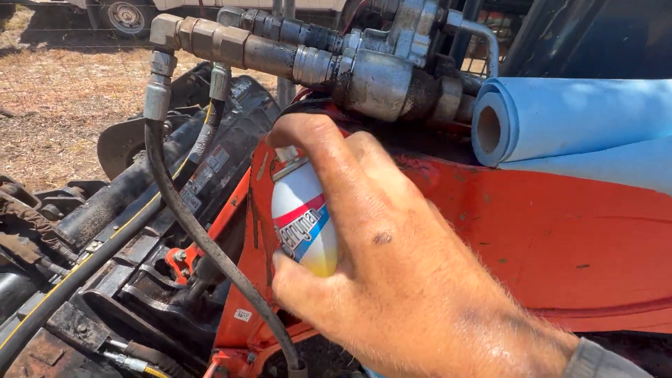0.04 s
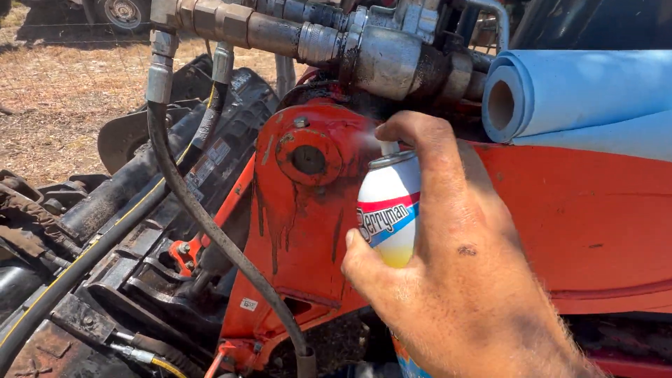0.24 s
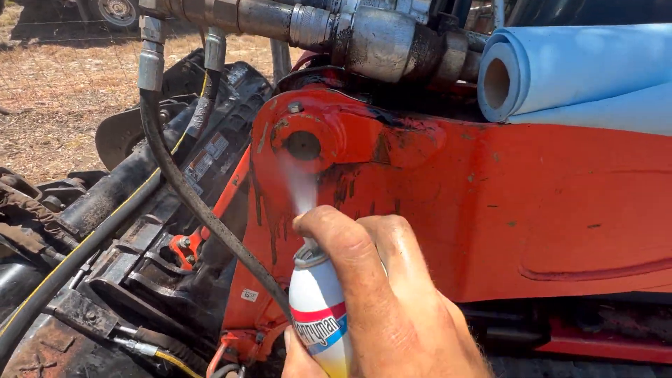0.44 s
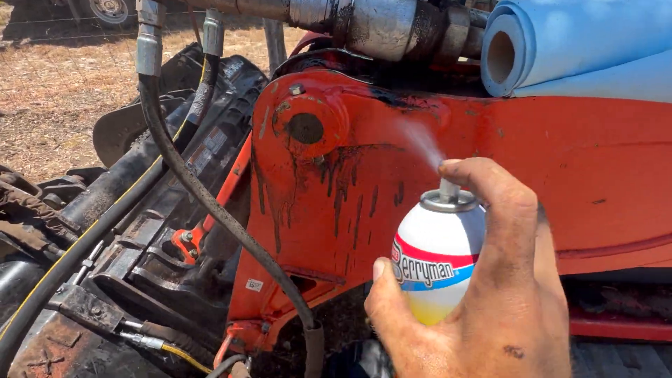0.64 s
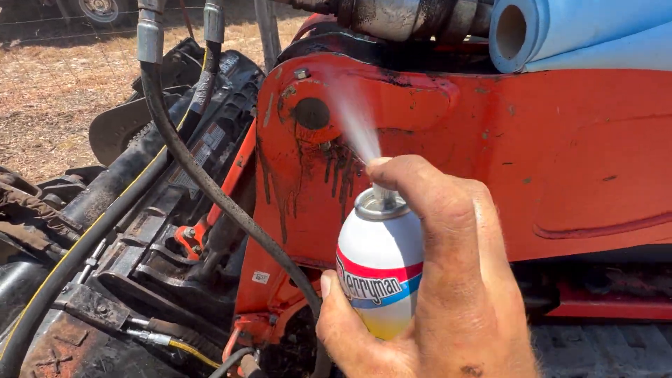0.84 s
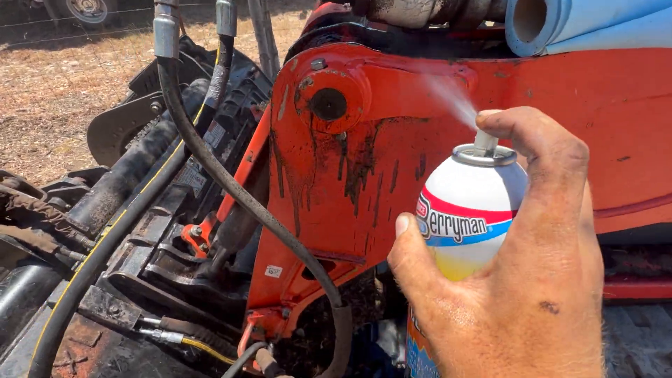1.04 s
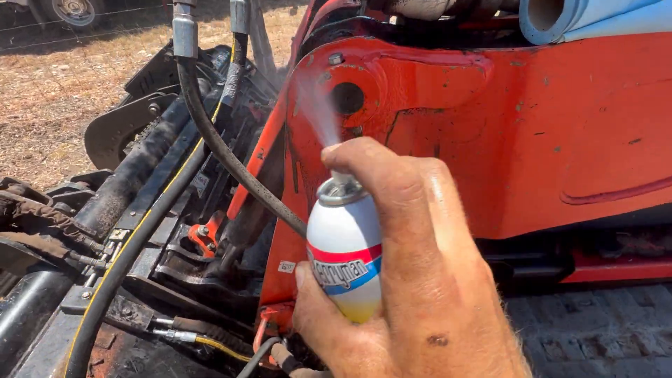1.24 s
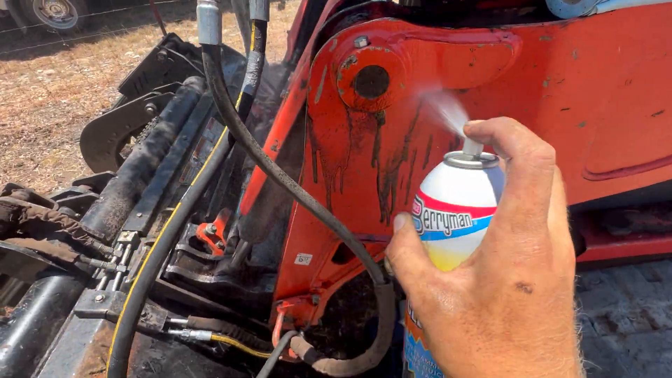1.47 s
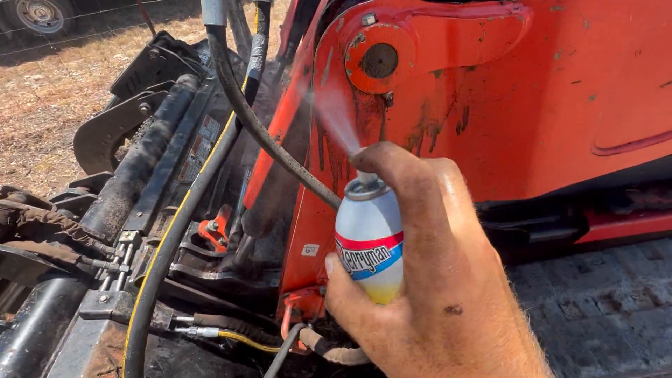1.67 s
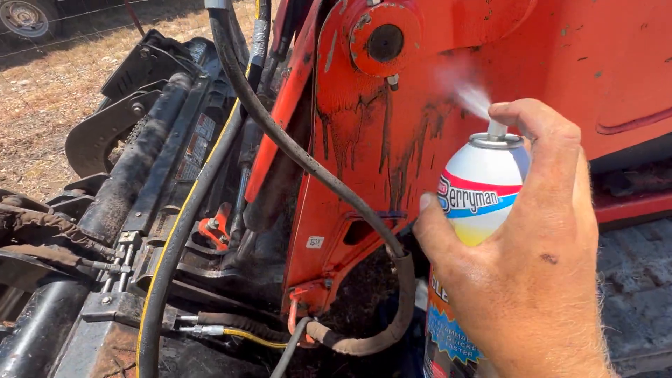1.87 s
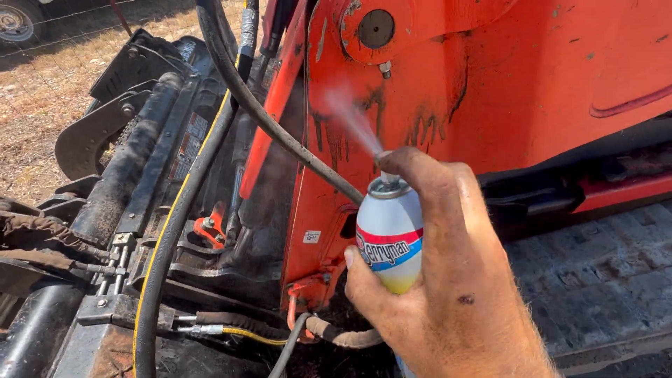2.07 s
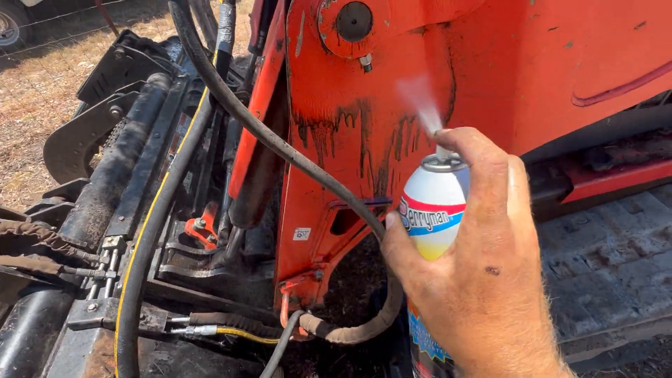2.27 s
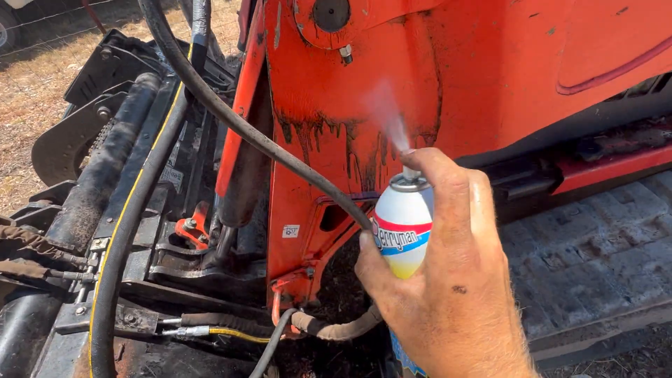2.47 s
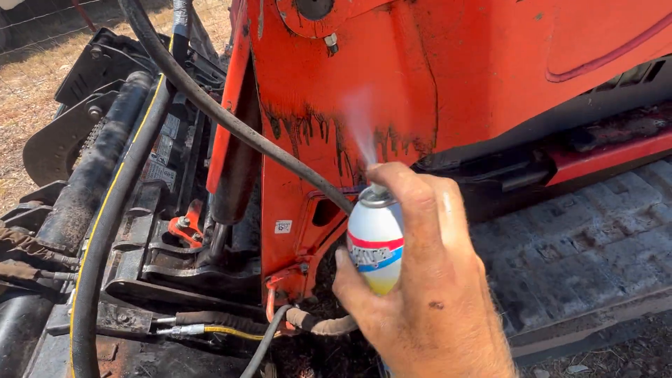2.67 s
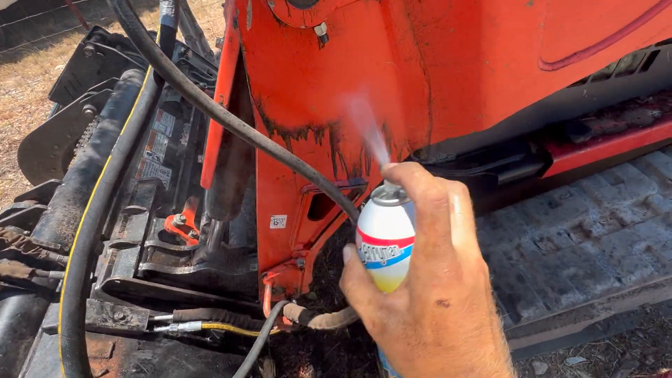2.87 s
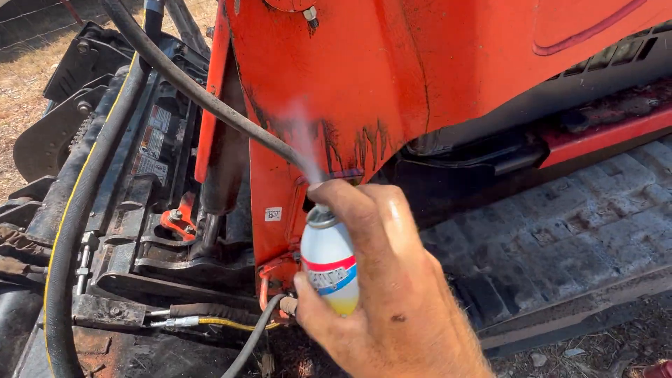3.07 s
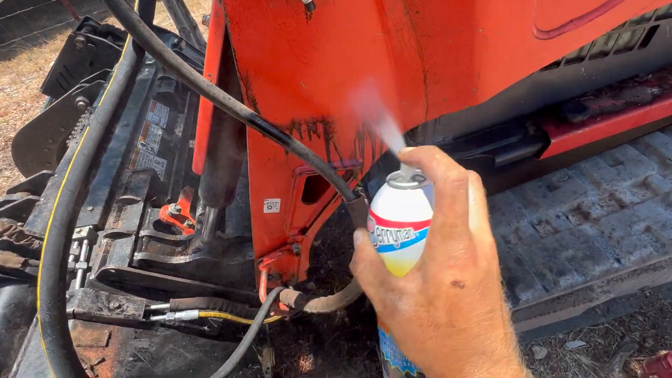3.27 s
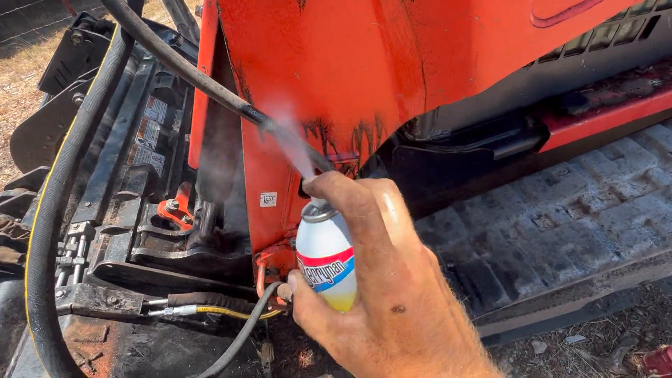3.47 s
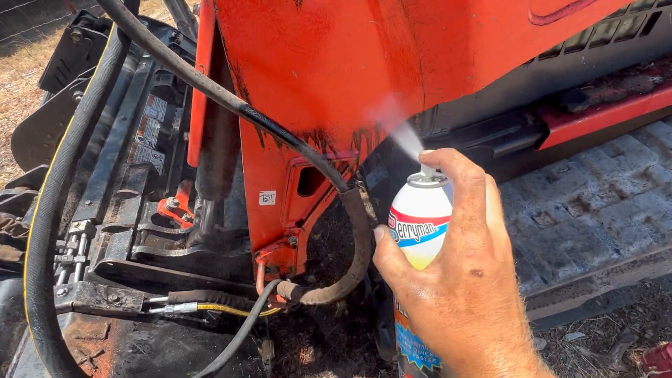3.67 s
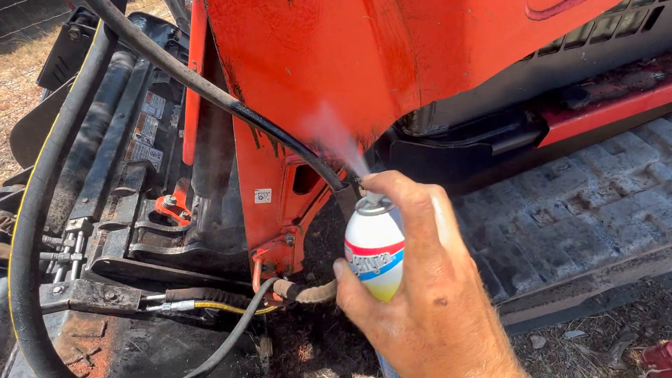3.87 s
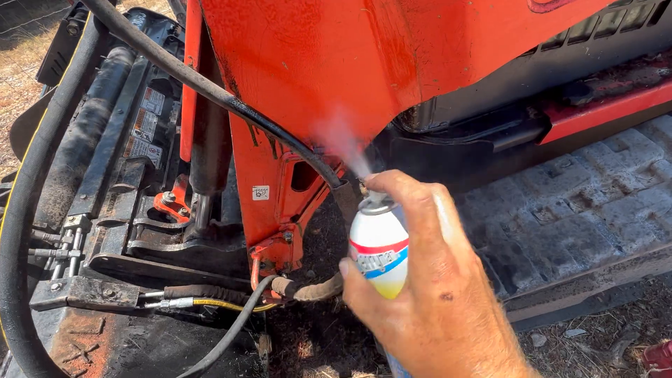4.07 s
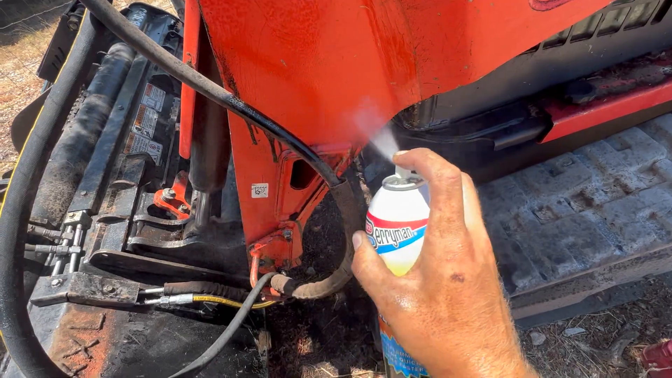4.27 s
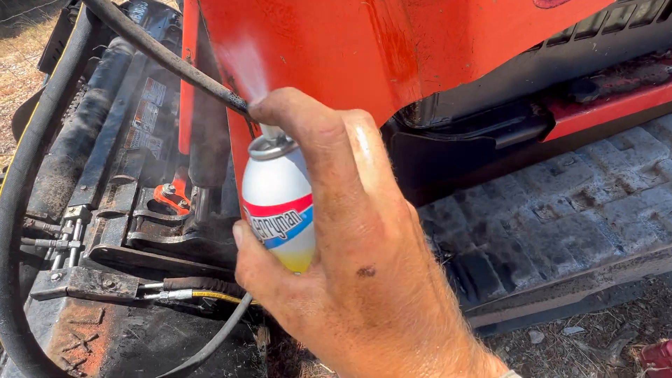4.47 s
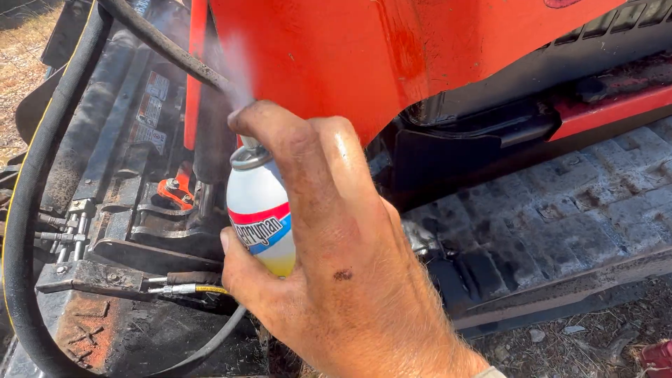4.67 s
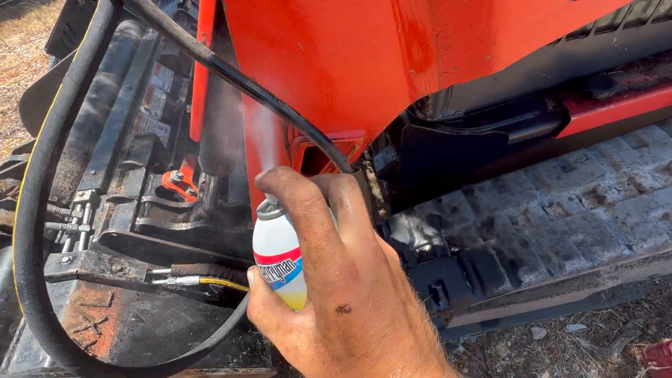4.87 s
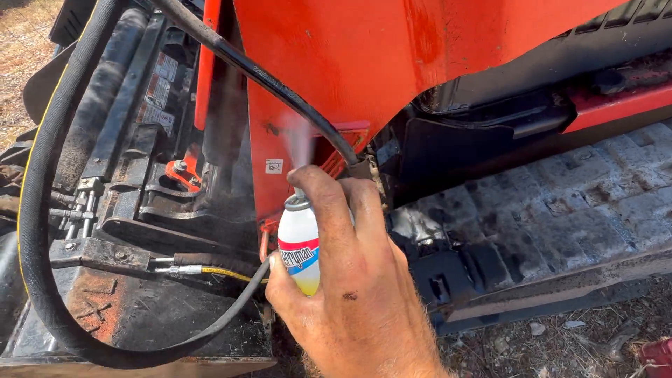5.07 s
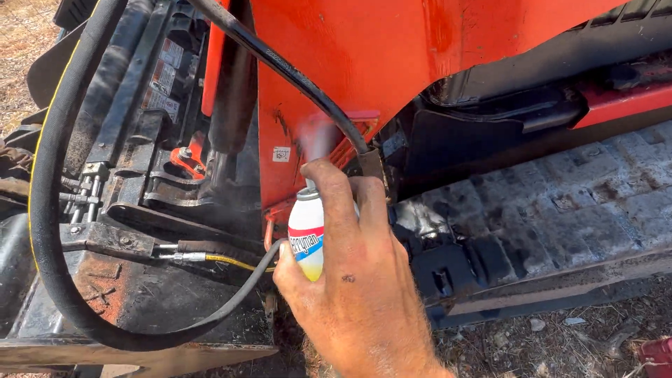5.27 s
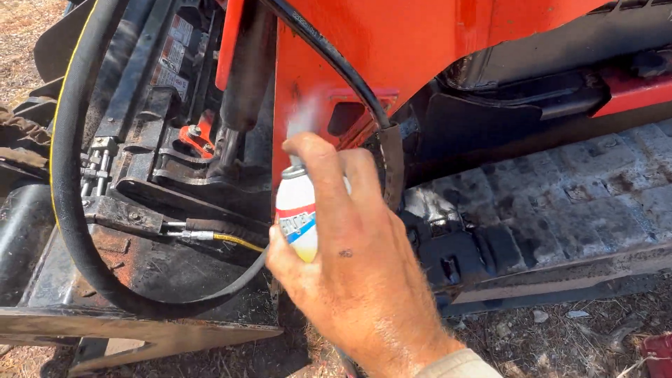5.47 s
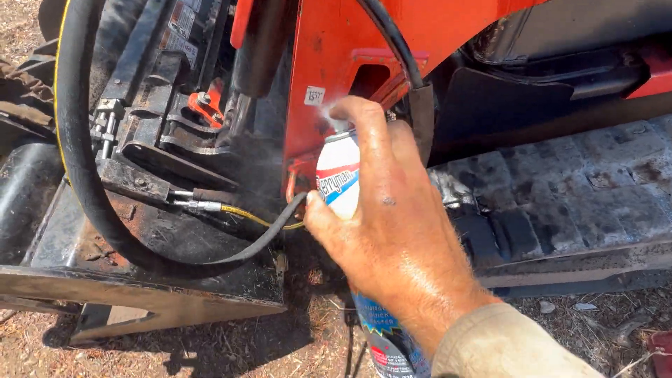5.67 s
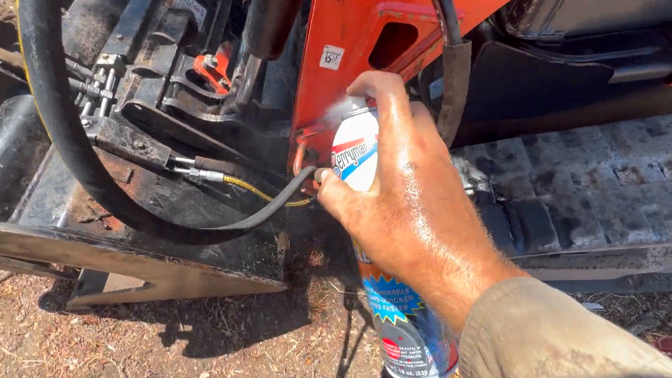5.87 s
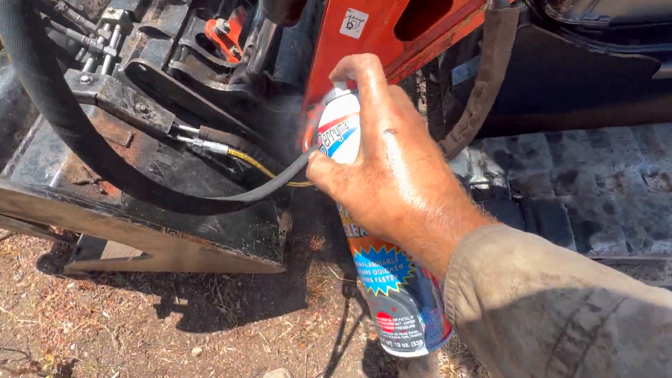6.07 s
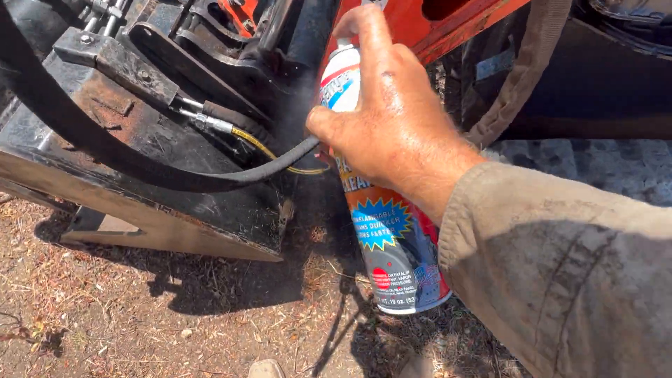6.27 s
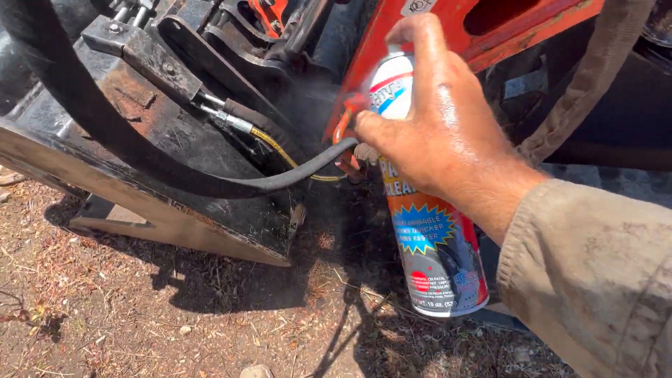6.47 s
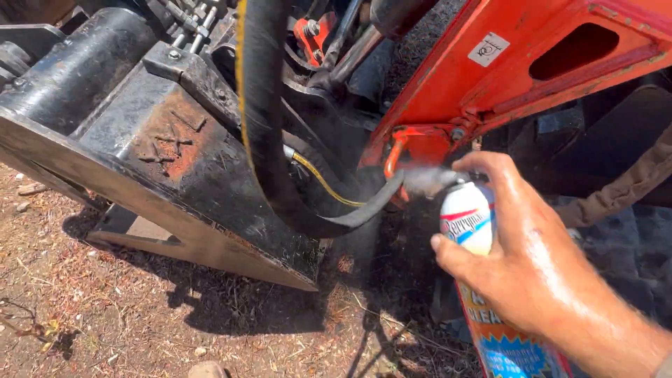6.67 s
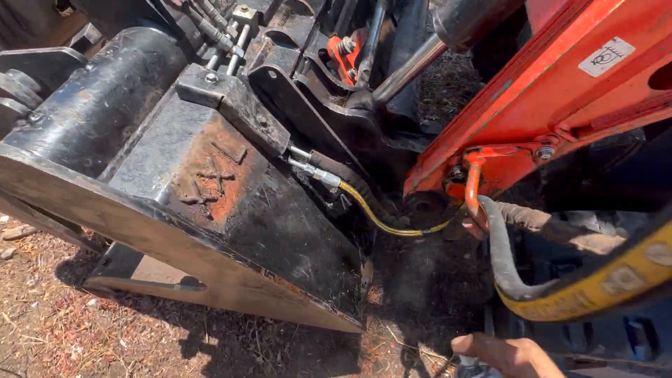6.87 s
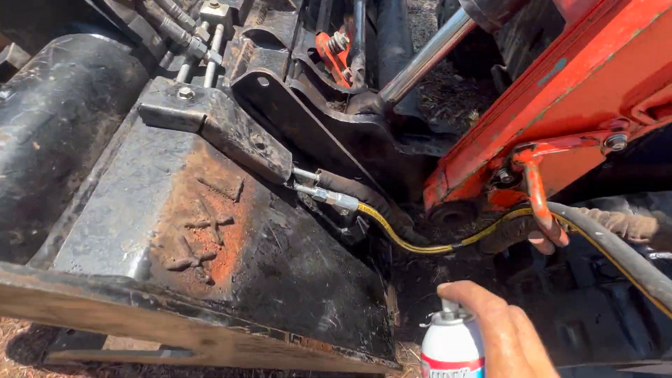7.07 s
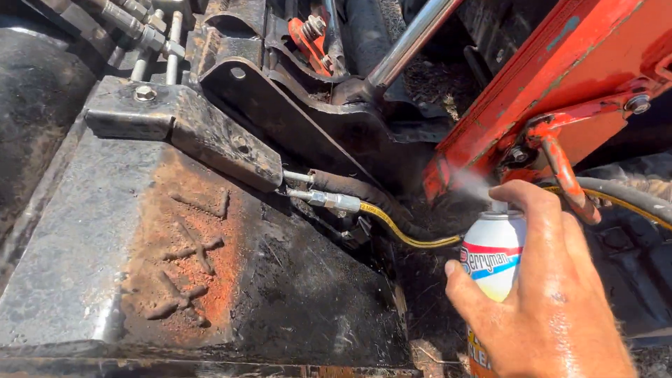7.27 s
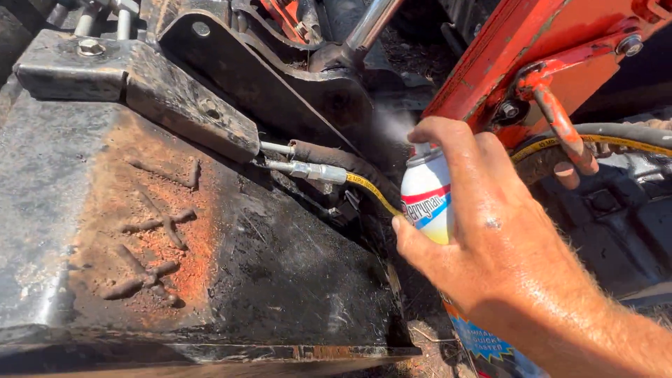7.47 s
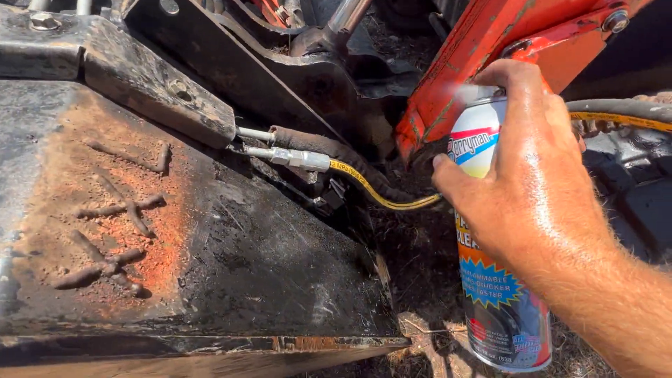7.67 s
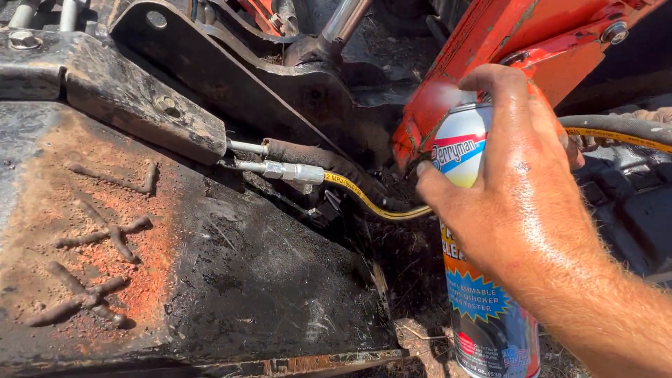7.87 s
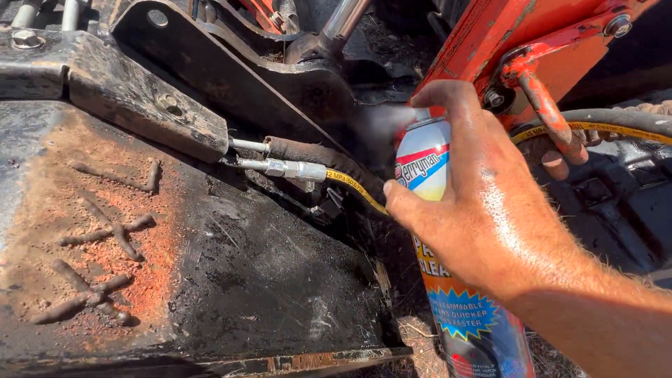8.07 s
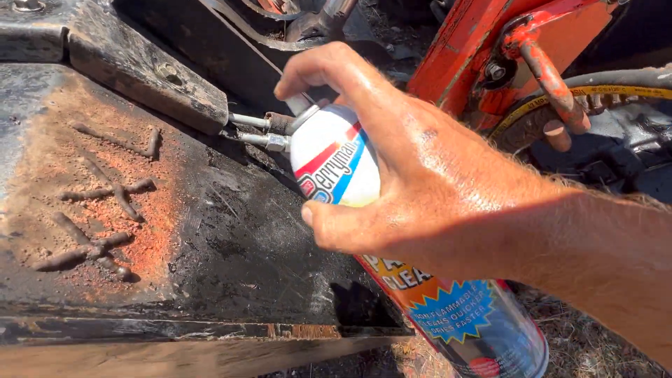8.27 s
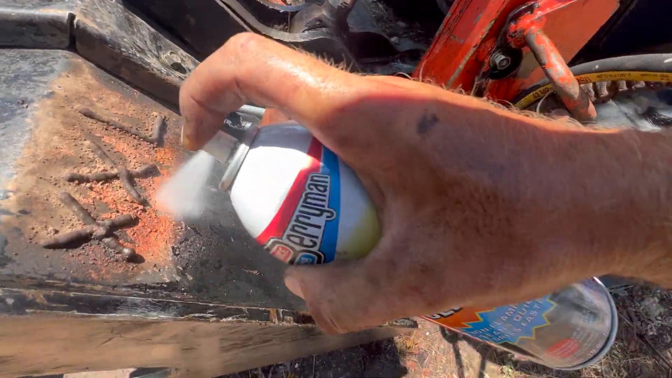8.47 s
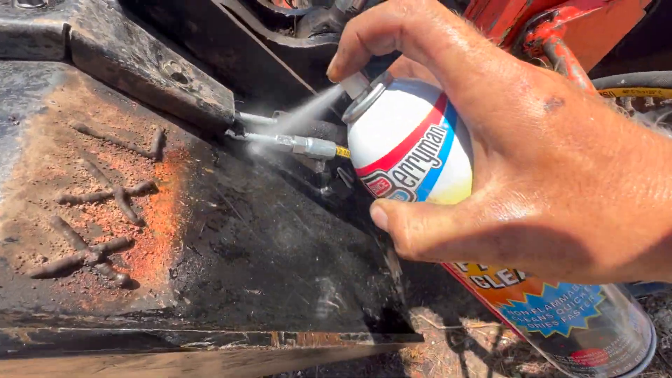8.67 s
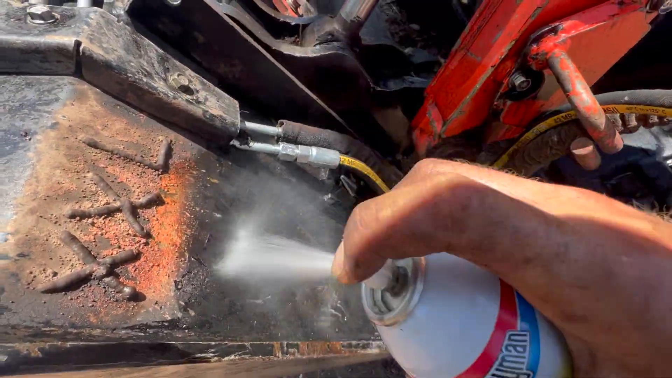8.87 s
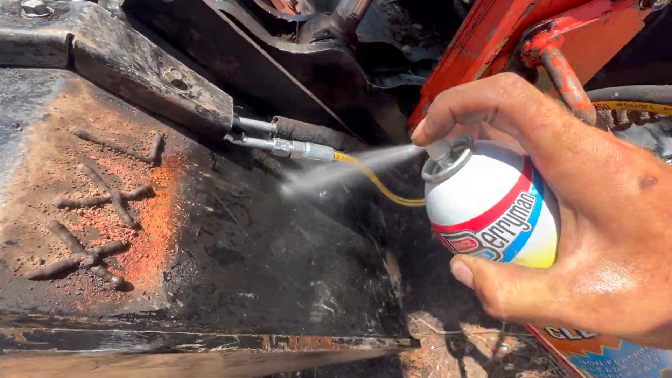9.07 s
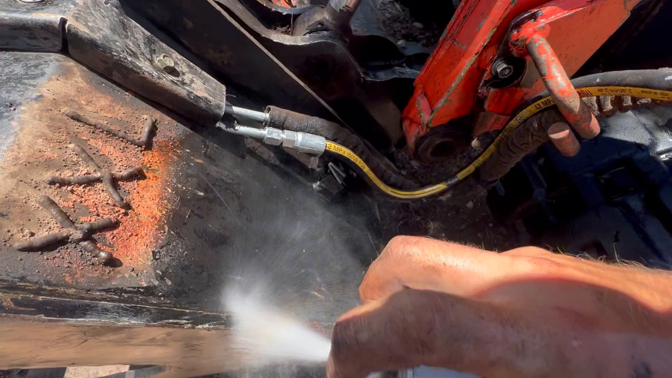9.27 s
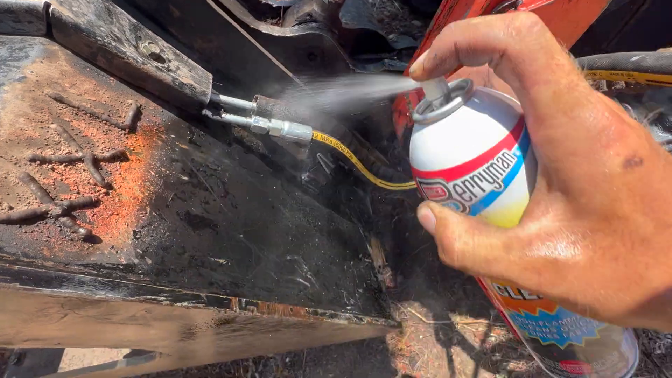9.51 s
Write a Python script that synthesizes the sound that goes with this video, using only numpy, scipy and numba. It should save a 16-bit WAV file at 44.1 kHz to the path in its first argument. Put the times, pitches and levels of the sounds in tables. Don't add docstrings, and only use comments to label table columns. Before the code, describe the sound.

An aerosol can sprays a steel machine arm in one long hissing blast, pauses briefly, then sprays again, over faint wind and engine rumble.

```python
import sys
import numpy as np
from scipy import signal
from scipy.fft import rfft, irfft, next_fast_len
from scipy.io import wavfile
from scipy.ndimage import uniform_filter1d
from numba import njit

SR = 44100
rng = np.random.default_rng(int(sys.argv[2]) if len(sys.argv) > 2 else 0)


def put_to_file(sound):
    columns = np.atleast_2d(sound).T
    safe = np.clip(columns, -1, 1)
    whole_steps = np.round(safe * 32767)
    wavfile.write(sys.argv[1], SR, whole_steps.astype(np.int16))


def boost_factor(decibels):
    exponent = np.asarray(decibels, float) / 20
    return 10 ** exponent


N = 420713
PADDED = next_fast_len(N)
HZ = np.arange(PADDED // 2 + 1) * SR / PADDED
TOP_LAG, TOP_HZ = 12.72, 8200


def rms_one(x):
    return x / np.sqrt(np.mean(x ** 2) + 1e-20)


def bins(x):
    return rfft(x, PADDED)


def wave(spectrum):
    return irfft(spectrum, PADDED)[..., :N]


def in_time(rows):
    s, *columns = np.transpose(rows)
    return [np.interp(np.arange(N) / SR, s, c) for c in columns]


def colour(table):
    hz, *sides = np.transpose(table)
    return boost_factor(np.array([np.interp(np.log(HZ + 1), np.log(hz), s) for s in sides]))


def above(hz, octaves):
    return .5 + .5 * np.tanh(np.log2((HZ + 1) / hz) / octaves)


def drift(rate):
    r = np.exp(-40 * np.pi * rate / SR)
    slow = signal.lfilter([1], [1, -2 * r, r * r], rng.standard_normal(N // 20 + 4002))[4000:]
    return np.interp(np.arange(N) / 20, np.arange(len(slow)), rms_one(slow))


def bumps(s, size, length):
    t = np.arange(0, N + 64, 64) / SR
    coarse = np.asarray(size) @ np.exp(-((t - np.c_[s]) / np.c_[length]) ** 2)
    return np.interp(np.arange(N) / SR, t, coarse)


@njit
def late(x, samples):
    out = np.zeros(len(x))
    for i in range(len(x)):
        at = i - samples[i]
        first = int(np.floor(at))
        s = np.sin(np.pi * (at - first)) / np.pi
        for k in range(-3, 5):
            d = at - first - k + 1e-9
            sinc = (s + 1e-9) * (1 - 2 * (k & 1)) / d
            out[i] += x[(first + k) % len(x)] * sinc * (1 - d * d / 20) ** 2
    return out


def around(x, hz, width_hz):
    turn = np.exp(2j * np.pi * np.cumsum(hz) / SR)
    low_pass = signal.butter(2, width_hz / 2, fs=SR, output="sos")
    return 2 * (turn * signal.sosfiltfilt(low_pass, x / turn)).real


# pitch_hz, left_db, right_db
AIR = [(30, -14, 9), (60, 1, 4), (122, 3.5, 2.5), (268, 2, 5), (510, 0, -2.5), (900, -7, -6),
       (1510, -18.5, -17), (2750, -23, -26), (4630, -34, -29), (6200, -34, -19), (8100, -30, -29),
       (11000, -36, -41), (15500, -36, -40)]
# start_s, rumble_db, left_minus_right_db, air_db
SITE = [(0, -52.5, 0.5, -61), (.6, -47, -6, -50.5), (1.2, -48.5, -5.5, -52.5), (2.05, -51.5, -12, -53.5),
        (2.2, -53, -2, -61), (2.6, -57, 0, -54), (3.2, -48.5, -1, -53), (4.0, -49.5, 1.5, -52.5),
        (4.8, -47.5, 1, -48.5), (6.0, -47.5, 0.5, -52.5), (7.0, -46, 0, -51.5), (8.2, -47, 1.5, -51),
        (8.4, -48, 0, -47), (9.54, -44.5, -2, -45)]
# centre_s, level_db over the rumble, length_s
BUFFETS = [(0.278, 4, 0.1), (0.688, 10.5, 0.023), (0.84, 6, 0.04), (0.938, 13.5, 0.052), (1.123, 6, 0.067),
           (1.328, 10, 0.026), (1.475, 11, 0.018), (1.604, 9, 0.038), (1.772, 11, 0.056), (1.93, 10, 0.019),
           (2.02, 8, .03)]


def site():
    wind_db, pan_db, air_db = in_time(SITE)
    shared, other, *own = bins(rng.standard_normal((4, N)))
    own = np.array(own)
    band = (shared + 0.25 * own) * colour(AIR) * above(47.5, 0.31) * (1 - above(190, 0.52))
    rumble, turned = wave(band), wave(-1j * band[0])
    gust = np.clip(.25 - pan_db / 5.3, 0, 1)
    rumble[0] = np.cos(1.87 * gust) * rumble[0] + np.sin(1.4 * gust) * turned
    lumps = boost_factor(1.3 * drift(26) + bumps(*np.transpose(BUFFETS)))
    dull = 1 - .6 * above(2500, .5)
    mixed = other + own * (0.46 + 3.1 * above(760, 0.74))
    air = rms_one(wave(mixed * colour(AIR) * above(199, 0.45) * dull))
    wind = boost_factor(wind_db + .5 * pan_db * [[1], [-1]]) * lumps * rms_one(rumble)
    return wind + boost_factor(air_db + 1.8 * drift(13)) * air


# pitch_hz, width_hz
DRONES = [(114, 13), (222, 32)]
DRONE_DB = [-51, -60.5]
# centre_s, level_db, length_s
LOW_SURGES = [
    (0.01, -13, 0.47),
    (2.198, -17, 1),
    (5.503, -14, 0.21),
    (7.207, -4, .25),
    (8.924, 13, 0.12),
    (9.173, 11, .06),
    (9.4, 7, 0.087),
]
# centre_s, level_db, length_s
UPPER_SURGES = [
    (5.35, 13, 0.13),
    (5.69, 11, 0.054),
    (5.8, 11.8, 1.16),
    (9.0, 2.9, 0.21),
]


def engine():
    out, noise = 0, bins(rng.standard_normal(N))
    for (hz, width), level_db, surges in zip(DRONES, DRONE_DB, (LOW_SURGES, UPPER_SURGES)):
        drone = rms_one(wave(noise * np.exp(-((HZ - hz) / width) ** 2)))
        out = out + boost_factor(level_db - 4.0 + bumps(*np.transpose(surges))) * drone
    return out * boost_factor(np.array([[-1.5], [1.5]]))


# start_s, peak_db, pitch_hz, t60_s
TICKS = [
    (0.095, -37, 8400, 0.0054),
    (6.756, -45, 6530, .012),
    (6.820, -53, 7000, .008),
    (6.855, -46, 900, 0.013),
    (8.268, -46, 8800, 0.0055),
]


def ticks():
    out, t = np.zeros(N), np.arange(1500) / SR
    grit = uniform_filter1d(rng.standard_normal((len(TICKS), 1500)), size=9, axis=1)
    for (s, peak_db, hz, t60), noise in zip(TICKS, grit):
        i = round(s * SR)
        out[i:i + 1500] += boost_factor(peak_db - 60 * t / t60) * np.sin(2 * np.pi * hz * t) * (1 + 3.4 * noise)
    return out


# start_s, level_db, climb_db_per_s
SEEP = [
    (0, -85, -20),
    (6.601, -65.5, 18.5),
    (8.1, -83, -1),
]
# pitch_hz, width_hz, level_db
SEEP_PEAKS = [(6070, 560, -1), (4500, 990, -8), (3000, 1500, -16), (11000, 12000, -9)]


def seep():
    shape = sum(boost_factor(db) * np.exp(-((HZ - hz) / width) ** 2) for hz, width, db in SEEP_PEAKS)
    noise = 0.62 * rng.standard_normal(N) + rng.standard_normal((2, N))
    t, (s, db, climb) = np.arange(N) / SR, np.transpose(SEEP)
    last = np.maximum(np.searchsorted(s, t, side="right") - 1, 0)
    level_db = db[last] + climb[last] * np.minimum(t - s[last], .6)
    return boost_factor(level_db + 1.5 * drift(30)) * rms_one(wave(bins(noise) * shape))


# open_s, shut_s, rise_s, fall_s, early_leak_db
VALVE = [
    (-0.050, 0.022, .008, 0.0038, -32),
    (0.094, 6.686, 0.009, .014, -38),
    (7.154, 8.222, 0.01, 0.0084, -15),
    (8.355, 12.000, 0.02, .010, -20),
]


def valve():
    t, flow = np.arange(N) / SR, 0
    for opens, shuts, rise, fall, leak_db in VALVE:
        leak = boost_factor(leak_db) * np.exp(-np.maximum(opens - t, 0) / 0.0088) * (t < opens + rise)
        on = np.clip((t - opens) / rise, 0, 1) + leak
        since = np.maximum(t - shuts, 0)
        sigh = boost_factor(-56) * (since > 0) * np.exp(-since / 0.0057)
        flow = flow + on * (np.exp(-(since / fall) ** 2 * 7.9) + sigh)
    return flow


# centre_s, depth (negative turns back), lag_lost_samples
FLICKS = [(.48, 0.52, 7), (.85, 0.68, 2.5), (1.3, 0.76, 6.5), (1.5, -0.075, 0.5), (1.69, 0.64, 3),
          (2.06, 0.57, 3.5), (2.409, 0.34, 3), (2.78, 0.82, 2.1), (3.15, 0.84, 3), (3.51, 0.49, 3),
          (3.83, 0.54, 3), (4.16, 0.26, 2.7), (4.52, 0.16, 1), (4.89, 0.47, 1), (5.11, -0.15, 2),
          (5.55, 0.24, 1.5), (5.99, 0.18, 1.2), (6.6, 0.28, 0), (7.449, 0.18, 2), (7.651, 0.21, -0.5),
          (8.0, 0.075, 1), (8.58, 0.17, 0), (8.89, 0.64, 2), (9.26, 0.31, 3.5)]


def flicks():
    s, depth, lost = np.transpose(FLICKS)
    length_s = s * 0 + 0.1
    return bumps(s, depth, length_s), bumps(s, lost, length_s)


# start_s, splash_db, core_db and fizz_db over splash, lean_db to the left port
SPRAY = [(0.0, -27, 4.8, 0, 2), (0.3, -28.5, 9.2, -1.5, 3.5), (0.7, -27, 7.3, -1, 4.5),
         (1.1, -26.5, 9, -2, 4), (1.6, -27.5, 6.8, -3, 4.5), (2.2, -29, 7.9, -0.5, 5.5),
         (2.7, -28, 6.4, 1.5, 4.5), (4.0, -27.5, 6.1, 0, 5), (4.5, -28, 7.8, 0.5, 2),
         (4.95, -29, 7.4, 3, 0.5), (5.3, -30.5, 7, 3.5, -5), (5.75, -30, 5, -1, 3),
         (6.2, -32, 6.6, 1.5, 2.5), (6.7, -29, 6, 0.5, 4), (7.5, -29.5, 5.3, 1, 3.5),
         (8.2, -29.5, 8.4, 3.5, 2), (8.5, -26, 8.6, 2, 1.5), (9.54, -26, 7.9, 2.5, 1.5)]
# start_s, left_port_lag_samples
ARM = [(0, 9.8), (.3, 13.9), (.65, 15.6), (2.2, 14.6), (2.58, 14.9), (2.75, 13.2), (3.75, 12.6), (4.3, 13),
       (4.45, 8.1), (5.35, 10.95), (6.2, 9.5), (6.45, 9.2), (6.68, 11.9), (7.2, 14.4), (8.2, 12.2),
       (8.36, 9.5), (8.52, 8.1), (8.64, 11), (8.9, 14), (9.54, 14.3)]


def grip():
    splash_db, core_db, fizz_db, lean_db = in_time(SPRAY)
    flick, lost = flicks()
    core_db = core_db + 1 * flick
    tremor = 0.7 * drift(7.4)
    lag = uniform_filter1d(in_time(ARM)[0], size=3000) - lost + tremor
    rim_db = 0.5 - 16 * flick - core_db
    fizz_db = fizz_db + 3.5 * flick - core_db
    return splash_db + core_db, -core_db, rim_db, fizz_db, lean_db - 1 * flick, lag


# path_ms, level_db, sway_ms per sample of arm sweep, port_lag_multiple
ECHOES = [(0.327, -22, 0.002, 1.3), (0.549, -20, 0.0094, .8), (0.819, -21, -0.0144, 1.15),
          (1.15, -19, 0.0246, .45), (1.721, -13.5, 0.058, 1.5), (2.899, -15, -0.0742, .1)]
# start_s, path_stretch
REACH = [(0, 1.07), (1.5, 1.024), (2.6, 1.065), (3.3, 1.125), (4.4, 1.13), (5.4, 0.97), (5.8, 1.08),
         (6.2, 1.02), (6.7, 1.01), (7.2, 1.07), (7.6, 1.0), (8.2, 0.9), (8.4, 0.91), (8.9, 0.93),
         (9.54, 0.94)]


def echoed(x, lag, port_lag):
    reach, sweep = uniform_filter1d(in_time(REACH)[0], size=8000), lag - 12
    out = late(x, port_lag)
    for ms, db, sway, side in ECHOES:
        path = (ms * reach + sway * sweep) * SR / 1000 + side * port_lag
        out = out + boost_factor(db) * late(x, path)
    return rms_one(out)


# start_s, left_path_ms, left_db, right_path_ms, right_db
PANEL = [(0, 0.73, -24, 0.68, -24), (.6, 0.66, -7, 1.1, -15.5), (1.9, 0.8, -18, 1.27, -11),
         (2.3, 1, -6, 0.99, -12), (2.9, 1, -6, 1.18, -6), (4.35, 0.81, -11, 1.18, -10),
         (4.5, 1.2, 0, 1.2, -12.5), (5.4, 0.78, 3, 0.88, -14), (6.2, 0.74, -8, 0.89, -16),
         (6.7, 0.94, -8, 0.61, -13), (7.3, 1.036, -0.5, 0.71, -10), (7.75, 1.11, 0, 0.53, -28),
         (8.3, 1.2, -13, 0.52, -40), (8.7, 0.83, -9, 0.66, -16), (9.54, 0.9, -31, 0.64, -13)]
# start_s, path_ms, level_db
RECESS = [(0, 2.16, -19), (4.2, 2.75, -12), (4.5, 2.56, -9), (5.3, 2.1, -6), (5.5, 2.64, -11),
          (6.3, 1.9, -4), (6.7, 2.1, -16), (7.3, 1.9, 1), (8.2, 1.9, -12), (8.5, 2.1, -2), (9.54, 2, -4)]


def panel(both, lag):
    left_ms, left_db, right_ms, right_db = [uniform_filter1d(c, size=2000) for c in in_time(PANEL)]
    sway_ms = 0.036 * (lag - uniform_filter1d(lag, size=20000))
    short = wave(bins(both) * above(2100, 1.0))
    deep_ms, deep_db = in_time(RECESS)

    def back(x, ms, db):
        return boost_factor(db) * late(x, (ms + sway_ms) * SR / 1000)

    left = back(short[0], left_ms, left_db) + back(short[0], deep_ms, deep_db)
    right = back(short[1], right_ms, right_db) + back(short[1], deep_ms * .8, deep_db - 6)
    return both + np.array([left, right])


# pitch_hz, left_db, right_db
JET = [(300, -12.5, -10), (530, -26, -13.5), (823, -12, -4), (1550, -6.5, -8), (2300, -8, -4.5),
       (3270, -9, -3.5), (5200, -8.5, -4), (5920, -14, -1), (7000, -9.5, -4), (7980, -10, -0.5),
       (9500, -57, -12), (13000, -48.5, -7.5), (15500, -44, -3.5), (16200, -23, -17.5)]


def spray():
    core_db, splash_db, rim_db, fizz_db, pan_db, bearing = grip()
    lag = 1.121 * bearing - 1.5
    hiss = rng.standard_normal(N) * boost_factor(1.0 * drift(440) + 0.65 * drift(12.0))
    right = echoed(hiss, lag, 0 * lag)

    short = above(2930, 0.04)
    far = echoed(hiss, lag, TOP_LAG + 0.24 * (lag - TOP_LAG))
    far = far + boost_factor(-8.0) * late(far, 7.0 + 2.5 * uniform_filter1d(drift(2.9), size=1500))
    chest = 1 + boost_factor(-16.5) * np.exp(-2j * np.pi * HZ * 1.44 / 1000)
    deep = 1 - above(1440, 0.79)
    middle = bins(late(right, lag)) * (1 - deep) * chest
    bottom = bins(late(right, TOP_LAG + 1.8 + 0.22 * (lag - TOP_LAG))) * deep
    left = (middle + bottom) * (1 - short) + bins(far) * short

    own = bins(rng.standard_normal((2, N))) * (boost_factor(-16) * short + boost_factor(-9.5) * (above(1350, .15) - short))
    both = (np.array([left, bins(right)]) + own * (1 - above(TOP_HZ, 0.07))) * colour(JET)

    roar_db = uniform_filter1d(core_db, size=20000) - core_db - 22.0
    lean_db = (pan_db - np.mean(pan_db)) * [[1], [0]]
    edges = [above(249, 0.27), above(1177, 0.96), above(4950, 0.14),
             above(8526, 0.04), above(10950, 0.072), 0]
    levels_db = [roar_db, splash_db + 0.12 * lean_db + 0.11, 1.5 * lean_db + 0.18,
                 rim_db + 0.14, fizz_db + 2.03 * drift(9.0) + 0.11]
    out = 0
    for low, high, level_db in zip(edges, edges[1:], levels_db):
        zone = wave(both * (low - high))
        out = out + boost_factor(level_db) * zone / np.std(zone[1])
    return valve() * boost_factor(core_db - 0.51) * panel(out, lag)


# start_s, rest_hz, full_flick_hz, rest_gain, full_flick_gain
FOCUS = [(0, 6650, 7000, 0.36, .8), (.4, 6400, 7750, 0.31, 0.57), (1.1, 5680, 7700, 0.23, 1.5),
         (2.3, 6500, 8000, 0.14, 1.2), (2.6, 7750, 6750, 0.32, 0.74), (4.3, 8040, 6900, 0.28, 0.66),
         (4.6, 7460, 7200, 0.59, 1.1), (5.3, 8240, 8100, 0.28, 0.89), (5.5, 5969, 6200, 0.43, .5),
         (5.9, 7000, 7000, 0.94, .7), (6.4, 7650, 7600, 0.73, 0.55), (6.7, 6600, 6600, 0.37, .4),
         (7.2, 5630, 5600, 0.52, .4), (8.2, 7000, 6850, .4, .4), (8.4, 6800, 6700, 0.83, .9),
         (8.9, 6250, 6360, 0.37, 1.2), (9.54, 6900, 6500, 0.53, 1)]


def focused(both, flick):
    rest_hz, flick_hz, rest, full = in_time(FOCUS)
    turn = np.clip(flick, 0, 1)
    gain = (rest + (full - rest) * turn) * [[0.22], [1]]
    return both + gain * around(both, rest_hz + (flick_hz - rest_hz) * turn, 810)


def hollowed(x, hz, share, width_hz):
    track = hz + 110 * drift(3.2)
    return x - np.clip(share + 0.032 + 0.51 * drift(5.2), 0, 1) * around(x, track, width_hz)


# start_s, lower_hz, lower_depth (0-1), upper_hz, upper_depth (0-1)
HAND = [(0, 4400, 0.8, 6200, 0), (.6, 4940, .9, 7200, 0.4), (1.1, 4630, .85, 7200, 0.6),
        (1.35, 4030, 0.6, 7200, 0.4), (2.2, 4460, 0.4, 7000, 0.3), (2.75, 4620, .9, 7000, 0.2),
        (3.7, 4940, 1, 7100, 0), (4.35, 5100, 0.9, 6800, 0.1), (4.45, 4270, 1, 5560, 0.4),
        (5.4, 4500, 0.6, 6620, 0.5), (5.65, 4100, 0.7, 6500, 0.4), (6.6, 3900, 0, 7000, 0.1),
        (7.2, 4350, 0, 6000, 0.1), (8.2, 4200, 0.2, 6110, 0.3), (8.7, 3840, 0.6, 5600, 0),
        (9.1, 4630, .8, 5900, 0.1), (9.3, 3980, 0.6, 5800, 0), (9.54, 3800, 1, 5840, 0.1)]
# start_s, lower_hz, lower_depth (0-1), upper_hz, upper_depth (0-1)
SHADE = [(0, 4120, .9, 4640, .3), (.3, 3760, .9, 4600, .5), (.7, 3500, 1, 4900, .95),
         (2.1, 3630, 1, 4870, .95), (2.4, 3650, 0.3, 4830, .8), (2.7, 3730, .9, 4870, 0.9),
         (4.3, 3570, 1, 4900, 0.8), (4.45, 3380, .8, 4200, .95), (5.0, 3700, 0.5, 4300, 0.7),
         (5.4, 3950, 0.5, 4670, 0.8), (5.8, 4000, 0.8, 5100, 0.67), (6.6, 3600, 0.3, 5430, 0.7),
         (7.2, 3430, 0.5, 5000, 0.4), (7.5, 2960, 0.5, 5200, 1), (8.2, 2780, 0.8, 5140, 1),
         (8.5, 3760, 0.5, 4370, 0), (9.0, 3500, 0.6, 4670, 0.1), (9.54, 3500, 0.6, 4830, .8)]


def shaded(both):
    flick, _ = flicks()
    low_hz, low, high_hz, high = in_time(HAND)
    left, right = hollowed(focused(both, flick), high_hz - 1300 * flick, high, 350)
    right = hollowed(right, 10230 - 1100 * flick, 0.51, 170)
    right = hollowed(right, low_hz - 150 * flick, low, 280)
    low_hz, low, high_hz, high = in_time(SHADE)
    left = hollowed(left, low_hz - 60 * flick, low, 340)
    left = hollowed(left, high_hz - 800 * flick, high, 340)
    return np.array([left, right])


# start_s, length_s, from_hz,
# to_hz, width_hz
OPPOSED = [(0.1, 0.26, 2160, 1860, 288), (0.165, 0.29, 1440, 1510.0, 120.0),
           (0.38, 0.13, 2260, 2240, 450.0), (0.45, 0.35, 1550.0, 1390.0, 225),
           (0.804, 0.11, 1740, 1960, 210.0), (0.793, 0.46, 1360, 1370, 219), (1.19, 1.2, 1430, 1400, 201),
           (1.198, 0.21, 1950.0, 1950.0, 330.0), (1.626, 0.13, 1940, 1930, 330.0),
           (1.997, 0.15, 1920, 1960, 330.0), (2.274, 0.29, 1980, 2030, 330.0),
           (2.606, 0.091, 1920, 1930, 220.0), (2.737, 0.063, 2740, 2750, 240.0),
           (2.806, 0.23, 1900, 1940, 240.0), (3.06, 0.15, 2600, 2690, 437),
           (3.222, 0.31, 1940, 1820, 170.0), (3.43, 0.1, 2520, 2700, 249), (3.605, 0.34, 1870, 1900, 200.0),
           (4.005, 0.35, 1870, 1930, 150.0), (4.348, 0.046, 2680, 2710, 240.0),
           (4.4, 0.34, 2790, 2850, 314), (4.803, 0.088, 2780.0, 2780.0, 250.0),
           (4.877, 0.3, 2480, 2750.0, 615), (5.2, 0.11, 2800, 2790.0, 400.0),
           (5.355, 0.15, 2150.0, 2200.0, 170.0), (5.666, 0.12, 2860, 2400, 278),
           (6, 0.075, 2730.0, 2760, 180.0), (6.055, 0.085, 2190.0, 2200.0, 140.0),
           (6.367, 0.091, 2510, 2530, 750.0), (6.45, 0.1, 2220, 2040, 200.0),
           (7.338, 0.3, 1550, 1660, 190.0), (7.933, 0.083, 1540.0, 1770.0, 169),
           (8.147, 0.093, 1710, 1620, 140.0), (8.364, 0.19, 2920, 2780, 413),
           (8.544, 0.088, 2520, 1930, 550.0), (8.584, 0.2, 1730, 1700.0, 200.0),
           (8.815, 0.051, 2180.0, 2210.0, 120.0), (8.94, 0.2, 1560.0, 1620, 170.0),
           (9.215, 0.15, 2220, 1980, 260.0), (9.445, 0.1, 1590.0, 1600, 110.0),
           (0.105, 0.1, 4400, 4500, 220.0), (0.2, 0.09, 4840, 4850, 200.0),
                (0.139, 0.031, 5530.0, 5530, 230.0), (0.354, 0.045, 5100.0, 4870.0, 180.0),
                (0.401, 0.13, 4350, 4450, 260.0), (0.55, 0.087, 4750.0, 5000.0, 150.0),
                (0.72, 0.08, 4700, 4900, 170), (0.3, 0.36, 1900, 1700, 170), (2.2, 0.25, 4600, 4260, 140),
                (0.801, 0.1, 5070, 5050, 200.0), (1.138, 0.049, 4750, 5040, 250.0),
                (1.202, 0.11, 5000, 5100, 380.0), (1.353, 0.081, 4860.0, 4900, 300.0),
                (2.003, 0.075, 4980.0, 4790.0, 140.0), (2.699, 0.11, 4400, 4470, 400.0),
                (2.804, 0.049, 4450.0, 4890.0, 560.0), (2.879, 0.2, 5500, 5360, 320.0),
                (3.204, 0.18, 5010.0, 5300.0, 300.0), (3.257, 0.06, 4110.0, 3970.0, 360.0),
                (3.59, 0.06, 4000, 4050, 300), (3.74, 0.03, 4050, 4150, 300),
                (3.605, 0.087, 5070, 5400, 190.0), (3.79, 0.06, 5300, 4950.0, 240.0),
                (3.872, 0.058, 4040.0, 4100, 270.0), (4.11, 0.04, 5250, 5250, 310.0),
                (4.127, 0.07, 4030.0, 4050.0, 300.0), (4.31, 0.09, 4030.0, 4130, 250.0),
                (4.365, 0.034, 5230.0, 5240, 280.0), (4.4, 0.038, 5330, 5020.0, 230.0),
                (4.4, 0.26, 4300, 4350.0, 150.0), (4.95, 0.48, 4240, 4500.0, 110.0),
                (5.45, 0.16, 2680, 2770, 200.0), (6.27, 0.089, 2620, 3060, 200.0),
                (6.3, 0.13, 3600, 3250.0, 240.0), (7.17, 0.069, 1680, 1680, 200.0),
                (8.4, 0.14, 2320, 1970, 120.0), (8.406, 0.12, 4160.0, 4230.0, 200.0),
                (8.406, 0.12, 3650, 3600, 130), (8.626, 0.11, 5030.0, 5000.0, 90.0),
                (8.78, 0.09, 3800.0, 4050, 130.0), (8.8, 0.053, 5060.0, 5050, 190.0),
                (9.009, 0.14, 3450, 3550, 130.0), (9.03, 0.14, 4650.0, 4850.0, 110.0)]


def opposed(both):
    shared = both.mean(axis=0)
    kept, wander_hz = shared.copy(), 39.7 * drift(8.3) + 45 * drift(18.0)
    depth = np.clip(1.02 + .04 * drift(5.8), 0, 1)
    edge_s, margin_s = 0.018, .04
    for s, length, from_hz, to_hz, width_hz in OPPOSED:
        i = max(round((s - margin_s) * SR), 0)
        j = min(round((s + length + margin_s) * SR), N)
        t = np.arange(i, j) / SR - s
        hz = from_hz + (to_hz - from_hz) * np.clip(t / length, 0, 1) + wander_hz[i:j]
        widen = 1.12 if from_hz < 3300 else 1.68
        band = around(kept[i:j], hz, widen * width_hz)
        fade = np.clip(np.minimum(t, length - t) / edge_s + 1, 0, 1)
        kept[i:j] -= depth[i:j] * fade * band
    return both - shared + kept


def scene():
    return opposed(shaded(spray())) + seep() + site() + engine() + ticks()


def top_cut(x):
    return signal.sosfilt(signal.butter(12, 17110, fs=SR, output="sos"), x)


def record(dry):
    limit = 1.1
    left, right = bins(limit * np.tanh(dry / limit))
    top = above(TOP_HZ, 0.042)
    left = left * (1 - top) - right * top * np.exp(2j * np.pi * HZ * TOP_LAG / SR)
    cut = 1 - above(15850, .004)
    return top_cut(wave(np.array([left, right]) * cut))


dry = scene()
out = record(dry)
put_to_file(out)
```